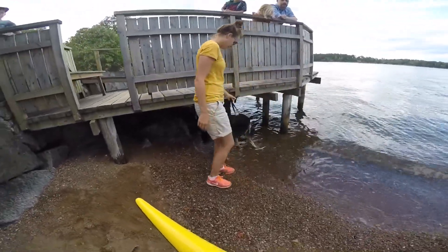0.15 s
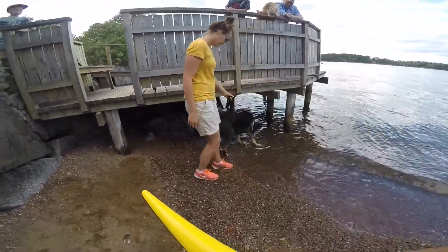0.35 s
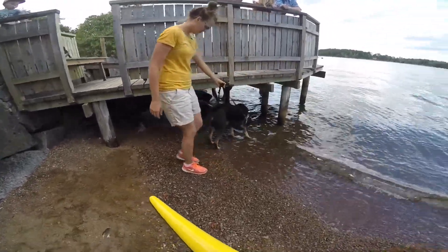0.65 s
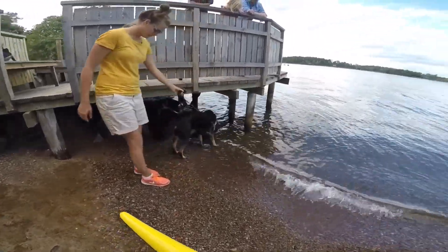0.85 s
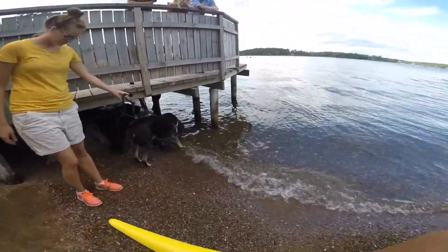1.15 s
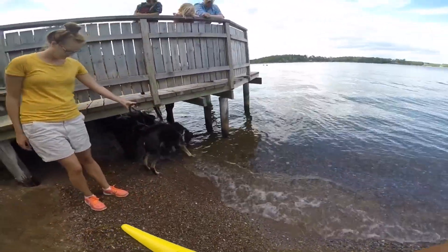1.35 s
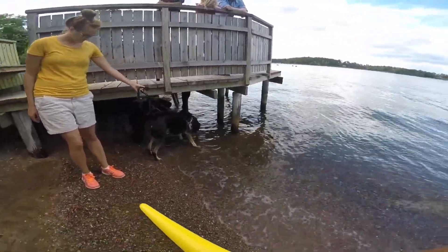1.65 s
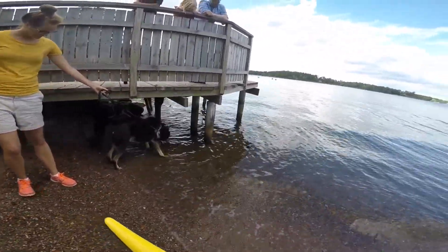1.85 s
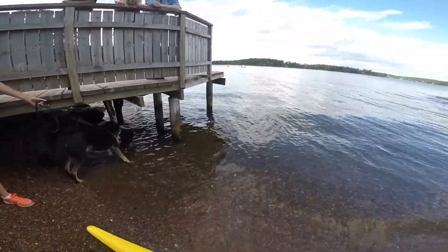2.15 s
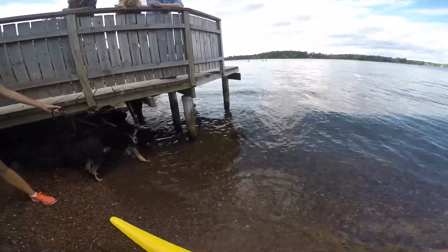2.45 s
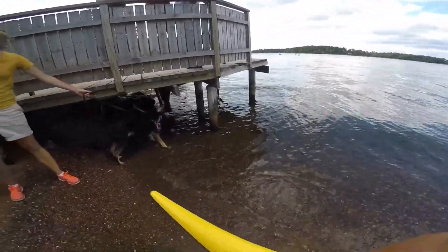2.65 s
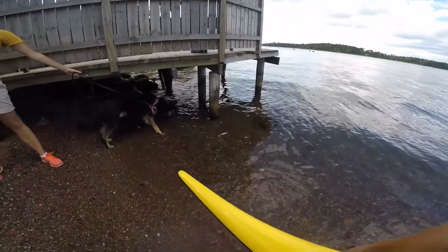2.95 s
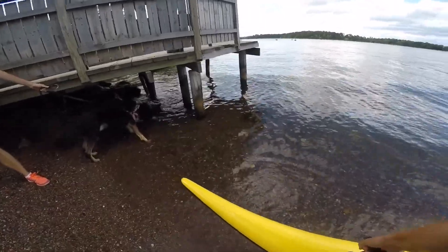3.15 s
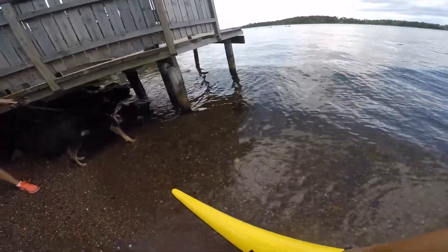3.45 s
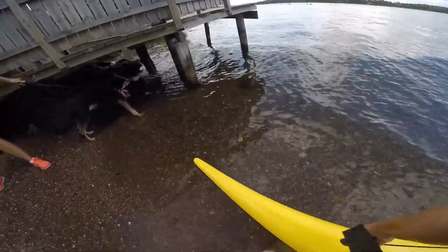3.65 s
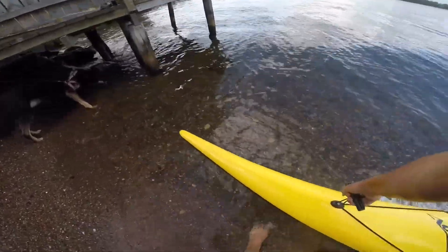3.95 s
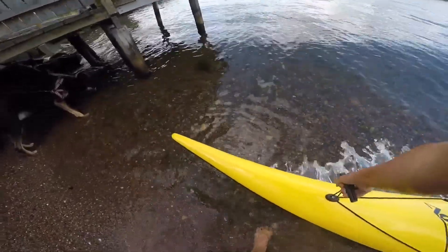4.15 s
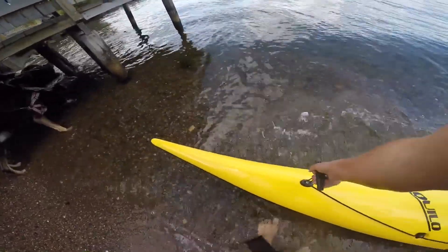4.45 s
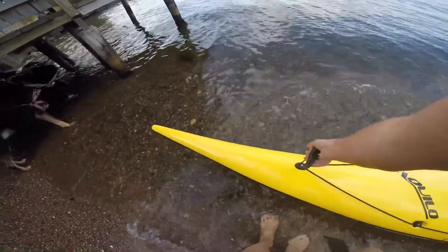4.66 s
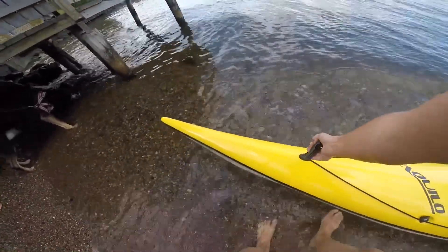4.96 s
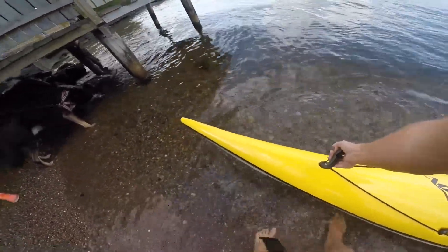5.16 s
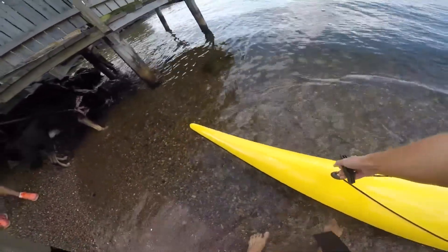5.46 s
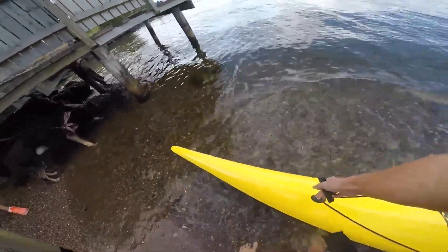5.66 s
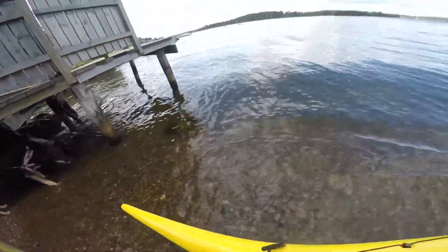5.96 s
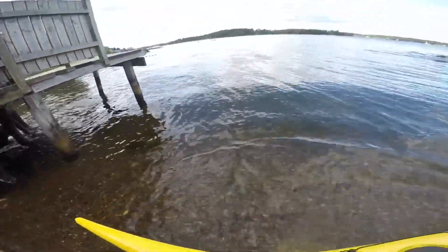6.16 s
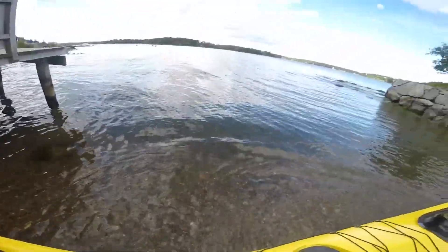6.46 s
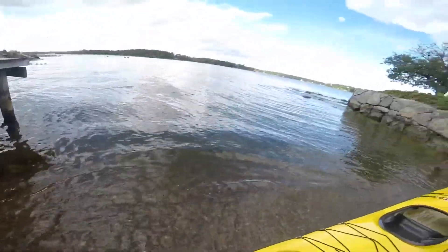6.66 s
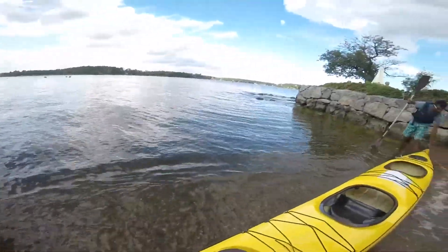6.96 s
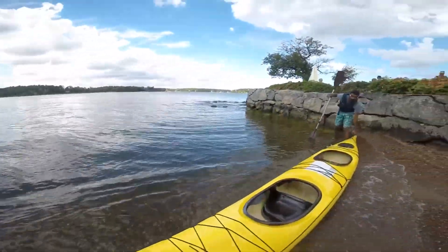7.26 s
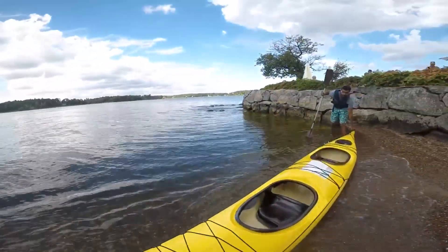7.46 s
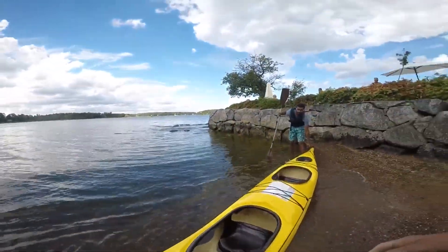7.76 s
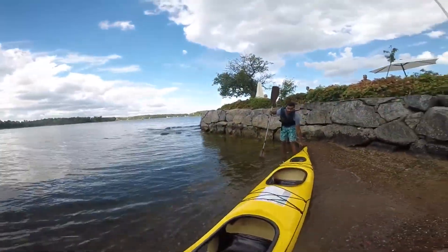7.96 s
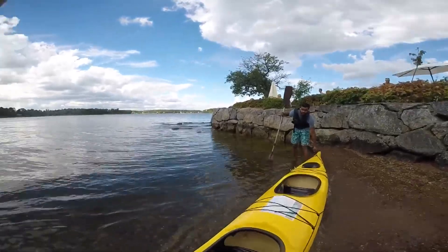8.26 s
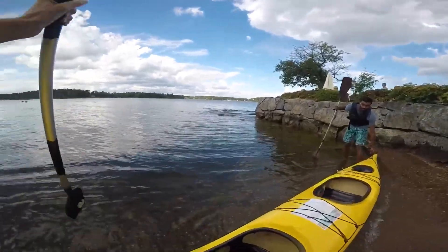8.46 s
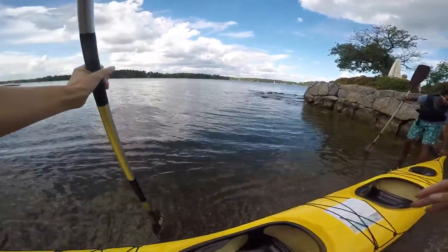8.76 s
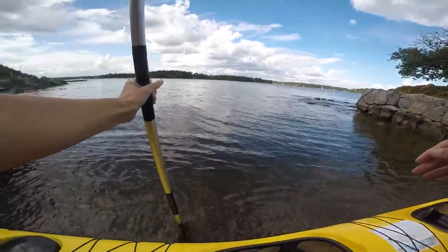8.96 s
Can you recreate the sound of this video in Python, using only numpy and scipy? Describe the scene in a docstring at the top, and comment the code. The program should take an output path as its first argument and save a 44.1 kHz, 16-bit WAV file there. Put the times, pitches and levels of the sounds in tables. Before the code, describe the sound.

Close, boxy knocks and low thumps come in uneven bursts as a plastic kayak is dragged over gravel on an open shore. Pebbles crunch and small waves wash and fizz. The heaviest blows land just after five seconds, briefly ducking everything; then it calms to scrapes, paddle clicks and a plip. A body-worn microphone in a hard case rumbles with movement.

```python
"""On a gravel beach a plastic kayak is hauled into the shallows, heard from a body-worn camera in a hard case.
Each heave knocks and judders: damped modes of the case over a swinging mount, with one thin ring left hanging.
Hull and gear scrape and steps crunch (coloured grains); paddle and fittings click (short modes) and bubbles plip.
Small waves wash and fizz over the pebbles (grains and froth), and the movement rumbles underneath.
The camera's limiter ducks everything for a moment after the hardest knocks."""
import sys
import numpy as np
from scipy.fft import rfft, irfft, next_fast_len
from scipy.io import wavfile
from scipy.ndimage import uniform_filter1d, map_coordinates

SR = 44100
rng = np.random.default_rng(int(sys.argv[2]) if len(sys.argv) > 2 else 0)


def unload_audio(sound):
    """Save the sound as a 16-bit wav file, at the path given as the first command line argument."""
    columns = np.transpose(np.atleast_2d(sound))
    # keep every value between -1 and 1, then stretch to whole-number steps
    steps = np.round(np.clip(columns, -1, 1) * 32767)
    wavfile.write(sys.argv[1], SR, steps.astype(np.int16))


N = 401751


def amp(db):
    """Decibels to amplitude."""
    return 10 ** (np.asarray(db) / 20)


def unit(x):
    """Scale to rms 1."""
    return x / np.sqrt(np.mean(x ** 2) + 1e-20)


def along(points, hz):
    """Read a value off (f/Hz, value) points on a log frequency axis."""
    f, v = np.transpose(points)
    return np.interp(np.log(hz + 1), np.log(f), v)


def curves(rows):
    """One value per sample for each column after the time."""
    s, *cols = np.transpose(rows)
    return [np.interp(np.arange(N) / SR, s, c) for c in cols]


def wobble(rate):
    """A smooth random curve, rate knots a second."""
    knots = rng.standard_normal(int(N * rate / SR) + 4)
    return map_coordinates(knots, [np.arange(N) * rate / SR])


def swell(middle, rise, fall):
    """A smooth hump of height 1 with its own rise and fall times."""
    t = np.arange(N) / SR - middle
    return np.exp(-np.minimum((t / np.where(t < 0, rise, fall)) ** 2, 40))


def filtered(x, response):
    """Multiply the spectrum of x by a response of frequency."""
    size = x.shape[-1]
    m = next_fast_len(size + 8192)
    return irfft(rfft(x, m) * response(np.fft.rfftfreq(m, 1 / SR)), m)[..., :size]


def add(track, s, sound):
    """Mix a sound into the track at time s."""
    part = track[:, max(round(s * SR), 0):][:, :sound.shape[-1]]
    part += sound[..., :part.shape[-1]]


def snippet(bed, t):
    """A random stretch of a long noise, as long as t."""
    start = rng.integers(N - len(t))
    return bed[:, start:start + len(t)]


def grains(rate, spread_db, hiss):
    """Two streams of tiny contacts of uneven size over an even hiss."""
    chance = rng.random((2, N))
    size = rng.standard_normal((2, N))
    smooth = rng.standard_normal((2, N))
    contacts = (chance < rate / SR) * np.sign(smooth) * amp(spread_db * np.clip(size, -2, 2))
    return unit(contacts) + hiss * smooth


def stereo(pair, spectrum, alike):
    """Colour two unrelated streams and spread them over the ports as middle and side; the middle has rms 1."""
    def response(hz):
        turn = np.arccos(np.clip(along(alike, hz), -.95, .995)) / 2
        return amp(along(spectrum, hz)) * np.array([np.ones_like(hz), np.tan(turn)])

    mid, side = filtered(pair, response)
    return np.array([mid + side, mid - side]) / np.std(mid)


def ring(t, hz, t60, rise, lead=0):
    """One mode: swells smoothly over the contact time while it decays exponentially."""
    decay = np.exp(-np.log(1000) * t / t60)
    onset = 1 - np.exp(-(t / rise) ** 3)
    return np.sin(2 * np.pi * hz * t + lead) * decay * onset


def bubble(t, hz, life):
    """A trapped bubble swells, rings at one pitch and dies away."""
    envelope = (t / life) ** 2 * np.exp(2 - 2 * t / life)
    return envelope * np.sin(2 * np.pi * hz * t + np.array([[0], [.6]]))


def froth(count, hz, spread_db):
    """Many small bubbles of uneven size, pitch and side, at rms 1."""
    track, t = np.zeros((2, N)), np.arange(SR // 50) / SR
    for s, (pitch, size, side) in zip(rng.uniform(0, N / SR, count), rng.standard_normal((count, 3))):
        bubble_hz = hz * np.exp(.22 * pitch)
        level_db = spread_db * min(size, 2) + side * np.array([[2], [-2]])
        add(track, s, amp(level_db) * bubble(t, bubble_hz, 4 / bubble_hz))
    return unit(track)


# wavelets on the pebbles: (crest t/s, run-up t/s, drain t/s, wash level/dB, fizz level/dB)
WAVELETS = [(.03, 0.13, 0.17, -47.5, -57.5), (.95, 0.26, 0.4, -39.5, -51.5), (1.7, 0.96, 0.51, -49, -63),
            (2.7, 1, 0.71, -48.5, -57.5), (3.5, 0.46, 0.22, -46.5, -60), (4.301, 0.15, 0.47, -42, -48),
            (4.62, 0.41, 0.14, -37.5, -65), (5.17, 0.22, 0.27, -34, -49), (6.05, 0.23, 0.27, -43, -64),
            (6.85, 0.58, 0.75, -48, -57.5), (8.95, 1, 0.52, -46.5, -58)]
LULL_DB, LULL_FIZZ_DB = -53.5, -59  # wash and fizz between wavelets
CREST_DB, CREST_LEAD_S = -9, 0.066  # fine froth relative to the wash, and how far it runs ahead


def surf(waves, lull_db, lead_s):
    """Strength of all the wavelets together, lead_s early: their powers add to that of the lull."""
    power = sum((amp(db) * swell(s - lead_s, rise, drain)) ** 2 for s, rise, drain, db in waves)
    return np.sqrt(amp(lull_db) ** 2 + power)


# spectra of the rolling water and of the fizz: (f/Hz, density level/dB)
WASH_SPECTRUM = [(150, -6), (330, 1), (500, -6.5), (850, -8), (1250, -5.5), (1550, 1), (1850, 5), (2450, 2),
                 (2950, -11.5), (4000, -12.5), (7000, -19.5), (12000, -77)]
FIZZ_SPECTRUM = [(1500, -60.5), (3200, 5.5), (4000, 0), (4700, 4), (6000, 0), (7200, 0), (8200, -4.5),
                 (10000, -4), (11500, -10.5), (14000, -9), (16000, -64)]
# airborne sound at the two ports: (f/Hz, left-right likeness; below zero the ports move against each other)
AIR_ALIKE = [(150, 0.79), (550, -0.62), (1100, -0.73), (2000, 0.76), (3500, -0.28), (8000, -0.13)]


def shore():
    """Wavelets run up the beach behind a crest of fine froth, rolling pebbles and fizzing as they drain."""
    washes = [row[:4] for row in WAVELETS]
    fizzes = [(*row[:3], row[-1]) for row in WAVELETS]
    water = stereo(grains(rate=1300, spread_db=0.0, hiss=1.0), WASH_SPECTRUM, AIR_ALIKE)
    water += amp(-7.0) * froth(count=2500, hz=1856, spread_db=4.0)
    crest = amp(CREST_DB) * froth(count=3000, hz=2455, spread_db=1.0)
    fizz = stereo(grains(rate=2800, spread_db=-3, hiss=1.0), FIZZ_SPECTRUM, AIR_ALIKE)
    ripple = amp(1.4 * wobble(22) + 1.1 * wobble(70))
    sea = water * surf(washes, LULL_DB, 0)
    sea += crest * surf(washes, LULL_DB, CREST_LEAD_S)
    sea += fizz * surf(fizzes, LULL_FIZZ_DB, 0)
    return ripple * sea


def bumps(count, spread_db):
    """Soft little jolts of the mount at random moments, at rms 1."""
    track, t = np.zeros((2, N)), np.arange(SR // 12) / SR
    for s, (pitch, size) in zip(rng.uniform(0, N / SR, count), rng.standard_normal((count, 2))):
        jolt = ring(t, 115 * np.exp(.16 * pitch), 0.028, 0.0036)
        add(track, s, amp(spread_db * min(size, 1)) * jolt)
    return unit(track)


# rumble of the wearer's movement, before trims: (t/s, sway level/dB, shudder level/dB)
MOVEMENT = [(0.0, -49, -39.5), (0.56, -38.5, -43.5), (0.94, -30, -38), (2.64, -32.5, -38),
            (2.81, -34, -33.5), (3.75, -21.5, -36.5), (3.91, -41, -50), (4.16, -37, -46),
            (4.41, -30.5, -49.5), (5.33, -27, -33), (5.81, -44, -41.5), (6.6, -38, -41.5),
            (7.5, -29, -34.5), (7.66, -32, -21.5), (7.81, -19, -33), (7.9, -25.5, -40), (8.2, -37, -26.5),
            (8.45, -26, -35), (8.83, -43.5, -40), (9.11, -18.5, -41)]
# spectra of the slow sway and of the droning mount: (f/Hz, density level/dB)
SWAY_SPECTRUM = [(8, 0.5), (20, 3.5), (45, -4), (75, -5.5), (120, -25), (300, -35.5), (800, -78)]
DRONE_SPECTRUM = [(30, -4.5), (80, -5), (135, 1), (175, 1), (240, -16.5), (350, -21), (600, -20),
                  (1500, -62)]
# sound carried by the case: (f/Hz, left-right likeness; below zero the ports move against each other)
CASE_ALIKE = [(60, 0.98), (150, 0.94), (300, 0.31), (550, -0.72), (1100, -0.36), (2000, 0.6), (4500, -0.53),
              (9000, -0.071)]
HEAVE_DB, HEAVE_GROWS, HEAVE_S = -29, 0.75, 0.072  # sway around a 0 dB thump; dB per dB of thump; half width
DRAG_DB, DRAG_S = -6, 0.16  # sway around a scrape, relative to its drone; half width


def movement():
    """The wearer's steps and sway rumble through the mount in lumps, swelling around each knock and scrape."""
    sway_db, shudder_db = curves(MOVEMENT)
    heaves = sum((amp(HEAVE_DB + HEAVE_GROWS * thump_db) * swell(s, HEAVE_S, HEAVE_S)) ** 2
                 for s, thump_db, *_ in KNOCKS)
    drags = sum((amp(DRAG_DB + drone_db) * swell((start + end) / 2, DRAG_S, DRAG_S)) ** 2
                for start, end, _, _, drone_db, _ in SCRAPES)
    effort = np.sqrt(amp(sway_db - 2.5) ** 2 + heaves + drags)
    sway_noise = stereo(rng.standard_normal((2, N)), SWAY_SPECTRUM, CASE_ALIKE)
    sway = sway_noise * effort * amp(0.53 * wobble(29))
    lumps = amp(3.5 * wobble(18))
    shudder = stereo(rng.standard_normal((2, N)), DRONE_SPECTRUM, CASE_ALIKE) * lumps * amp(-7.5)
    shudder += amp(-4.0) * bumps(count=140, spread_db=2.5)
    return sway + shudder * amp(shudder_db)


# gravel giving way under a foot or the keel: (middle t/s, length t/s, level/dB)
STEPS = [(0.952, 0.052, -35.5), (1.044, 0.076, -39.5), (1.41, 0.16, -43), (1.833, 0.076, -35.5),
         (2.255, 0.11, -40), (2.457, 0.073, -42.5), (2.887, 0.11, -37), (3.774, 0.24, -41.5),
         (4.274, 0.078, -37.5), (8.854, 0.066, -41.5)]
# spectrum of the crunch: (f/Hz, density level/dB)
GRAVEL_SPECTRUM = [(700, -22), (1400, 6), (2100, 11), (3400, -1.5), (4100, 0), (4800, -1.5), (7200, -5),
                   (8300, -10), (10000, -11), (11200, -27), (13000, -20), (15000, -72)]


def steps():
    """Pebbles shift in a short swell of fine crunching."""
    t = np.arange(N) / SR
    weight = sum(amp(db) * np.exp(-2 * np.abs((t - s) / length * 1.66) ** 3) for s, length, db in STEPS)
    return stereo(grains(rate=1900, spread_db=8.0, hiss=0.93), GRAVEL_SPECTRUM, AIR_ALIKE) * weight


# bubbles from feet and paddle in the water: (t/s, f/Hz, life t/s, level/dB)
PLIPS = [(4.31, 2644, 0.0019, -23.5), (4.315, 2500, 0.0019, -22), (4.321, 2746, 0.0014, -30),
         (6.944, 2890, 0.0013, -27.5), (6.945, 2240, 0.0012, -33), (8.8255, 2230, 0.0012, -12.5),
         (8.835, 1900, 0.0022, -14), (8.853, 2210, 0.0072, -34)]


def plips():
    """Each dip into the water traps one bubble amid a short spatter."""
    track, t = np.zeros((2, N)), np.arange(SR // 10) / SR
    spectrum = [(700, -32), (1300, 9.0), (2500, 10.5), (4500, 3.0), (10000, -22.5)]
    spatter = stereo(grains(rate=1200, spread_db=9.0, hiss=0.17), spectrum, AIR_ALIKE)
    for s, hz, life, db in PLIPS:
        splash = amp(-13.5) * snippet(spatter, t) * np.exp(-t / 0.0083)
        add(track, s, amp(db) * (bubble(t, hz, life) + splash))
    return track


# clicks of paddle and fittings: (t/s, low ring level/dB, high ring level/dB), before trims
CLICKS = [(5.8974, -24, -43), (6.171, -25.5, -47), (6.2283, -4.5, -21), (6.256, -19.5, -26.5),
          (6.29, -31, -31), (6.2955, -26, -33), (6.3155, -20, -13.5), (6.321, -27, -25),
          (6.375, -35, -43.5), (7.283, -30.5, -46), (7.424, -30.5, -44.5), (7.4586, -25, -23.5),
          (7.71, -13.5, -23.5), (7.7783, -20, -23.5), (7.783, -21, -25.5), (7.9163, -17.5, -22.5),
          (7.949, -16, -36.5), (8.04, -34, -30), (8.1218, -45, -26), (8.9797, -23, -22),
          (9.084, -28, -36.5)]
# nominal modes of the fittings: (f/Hz, t60 t/s, relative level/dB)
FITTING_MODES = [(1854, 0.009, -3), (2110, 0.0019, 14), (2470, .006, -10), (3160, 0.0071, -3),
                 (3690, 0.0057, -6), (4640, 0.012, -8.5), (5320, 0.0018, 6), (5380, 0.057, -21),
                 (6130, 0.0039, -5), (7540, 0.0053, -7.5)]


def clicks():
    """Hard little contacts: a broad snap and short rings, with the low and high modes struck separately."""
    track, t = np.zeros((2, N)), np.arange(SR // 16) / SR
    spectrum = [(600, -31), (1500, -8.5), (4500, 7.5), (7000, -1.5), (10000, -16.5), (15000, -18.5)]
    snap = stereo(rng.standard_normal((2, N)), spectrum, AIR_ALIKE)
    for s, low_db, high_db in CLICKS:
        envelope = np.exp(-t / 0.0021) * (1 - np.exp(-t / 0.00015))
        sound = amp(high_db + 5.5) * snippet(snap, t) * envelope
        for hz, t60, db in FITTING_MODES:
            touch_db = along([(3400, low_db), (6000, high_db)], hz)
            lead = rng.uniform(0, 2 * np.pi) + 1.3 * rng.standard_normal((2, 1))
            pitch = hz * (1 + .02 * rng.standard_normal())
            sound += amp(db + touch_db + 13.0) * ring(t, pitch, t60, 0.00072, lead)
        add(track, s, sound)
    return track


# scrapes: (start t/s, end t/s, rasp level/dB, grit level/dB, drone level/dB, scuff level/dB)
SCRAPES = [(0, 0.018, -33, -53, -21, -41), (2.787, 2.848, -39.5, -54, -27, -49),
           (3.75, 3.83, -32.5, -51, -20.5, -43), (4.766, 4.895, -32.5, -44.5, -23, -36.5),
           (5.743, 6.108, -35, -44.5, -36, -48), (6.101, 6.24, -47.5, -56, -36.5, -45),
           (6.277, 6.294, -54, -37, -31.5, -33.5), (7.021, 7.159, -35, -51, -31.5, -43),
           (7.566, 7.761, -35, -37.5, -22, -32.5), (7.902, 7.972, -29.5, -57, -28.5, -35),
           (8.042, 8.176, -31, -38.5, -28.5, -38), (8.228, 8.351, -31, -43, -36, -50.5),
           (8.381, 8.409, -31.5, -38.5, -24, -39), (8.978, 9.055, -30, -45, -26, -22)]
# spectra of the rubbing layers: (f/Hz, density level/dB)
RASP_SPECTRUM = [(150, 6.5), (260, -2), (380, -6), (490, -1), (620, -7.5), (850, -7.5), (1150, -2),
                 (1480, 1.5), (1900, -10.5), (2450, -3.5), (2850, -22.5), (3400, -11.5), (4500, -27),
                 (7000, -38.5), (12000, -52)]
GRIT_SPECTRUM = [(1500, -1), (2400, 10.5), (3400, -0.5), (4100, -6), (4650, 1), (5500, -17), (7400, -11.5),
                 (8300, -11), (10000, -20), (12000, -43), (15000, -31)]
SCUFF_SPECTRUM = [(500, -21.5), (800, -19.5), (1100, -7.5), (1750, 1.5), (2050, -3), (2450, -17),
                  (3000, -5.5), (4100, -14), (4600, -8), (5800, -17), (7300, -20), (9000, -33.5),
                  (14000, -53)]
# the scuff at the two ports: (f/Hz, left-right likeness)
SCUFF_ALIKE = [(700, -.5), (1400, 0.14), (2000, .4), (4000, 0)]
GRIP_S, RELEASE_S, ARCH_DB = 0.028, 0.036, 1.5  # a scrape bites, lets go, and presses harder in its middle


def scrapes():
    """Rubbing is a dense crowd of tiny catches: rasp, brighter scuff and fine grit, with the mount droning below."""
    t = np.arange(N) / SR
    catches = amp(1.8 * wobble(110))
    rasp = stereo(grains(rate=3000, spread_db=2.5, hiss=.45), RASP_SPECTRUM, CASE_ALIKE)
    grit = stereo(grains(rate=2500, spread_db=1, hiss=.5), GRIT_SPECTRUM, CASE_ALIKE)
    grit *= amp(2.2 * wobble(170))
    scuff = stereo(grains(rate=4000, spread_db=1.5, hiss=.5), SCUFF_SPECTRUM, SCUFF_ALIKE)
    drone = stereo(rng.standard_normal((2, N)), DRONE_SPECTRUM, CASE_ALIKE)
    track = np.zeros((2, N))
    for start, end, rasp_db, grit_db, drone_db, scuff_db in SCRAPES:
        contact = np.clip(np.minimum((t - start) / GRIP_S, (end - t) / RELEASE_S) + .5, 0, 1)
        pressure = amp(-ARCH_DB * np.interp(t, [start, end], [-1, 1]) ** 2)
        rub = amp(rasp_db) * rasp + amp(grit_db) * grit + amp(scuff_db) * scuff
        track += contact * (pressure * catches * rub + amp(drone_db) * drone)
    return track


SING_HZ, SING_T60_S, SING_DB = 1502, .7, -41  # level relative to the clack, which counts as -2 dB at most


def singing():
    """Every knock leaves a faint high ring hanging in the case, louder after a harder clack."""
    track, t = np.zeros((2, N)), np.arange(SR) / SR
    for s, _, clack_db, *_ in KNOCKS:
        lead = rng.uniform(0, 2 * np.pi) + np.array([[0], [1]])
        add(track, s, amp(SING_DB + min(clack_db, -2)) * ring(t, SING_HZ, SING_T60_S, .002, lead))
    return track


# nominal modes of the case: (f/Hz, t60 t/s, left level/dB, right level/dB, right lead/rad)
CASE_MODES = [(320, .035, -19, -25.5, 2.25), (481, 0.056, -20.5, -27.5, 2.5), (607, 0.044, -21.5, -23.5, 3),
              (726, 0.041, -25.5, -21.5, 3), (1034, 0.007, -11.5, -9.5, 2.5), (1240, .012, -12, -10.5, 2.5),
              (1485, 0.021, -20.5, -18.5, 1.5), (2100, 0.014, -35, -21.5, -1), (2462, .015, -28, -28, -0.3),
              (3337, 0.0059, -27.5, -25.5, -0.1), (4520, 0.014, -50, -44.5, 4.5),
              (5650, 0.011, -35, -41, 4)]
BRIGHT_ABOVE_HZ = 1800  # brightness lifts the modes above this
BOOM_DB, BOOM_BELOW_HZ = -2, 800  # the modes below this answer the thump
LOW_MODES_DB = -5.5  # how weakly a clack stirs those low modes


def clack(t, force_db, bright_db, hollow_db, vary_db, detune):
    """The stiff modes of the case share the energy of a blow anew each time."""
    sound = np.zeros((2, len(t)))
    for k, (hz, t60, left_db, right_db, lead) in enumerate(CASE_MODES):
        size, shift = rng.standard_normal(2)
        # broad modes shift most with the point of contact
        pitch = hz * (1 + detune * shift * min(.01 / t60, 1))
        share_db = vary_db * size + bright_db * (hz > BRIGHT_ABOVE_HZ)
        share_db += (LOW_MODES_DB + hollow_db) * (hz < BOOM_BELOW_HZ)
        # neighbouring modes swing in opposite directions
        mode = (-1) ** k * ring(t[t < 2 * t60], pitch, t60, 0.00044, np.array([[0], [lead]]))
        add(sound, 0, amp(share_db + np.array([[left_db], [right_db]])) * mode)
    return amp(force_db - 29.5) * sound / np.sqrt(np.sum(sound ** 2) / SR)


def boom(t):
    """The low modes of the case give a thump its hollow body."""
    body = 0
    for hz, t60, left_db, right_db, lead in CASE_MODES:
        if hz < BOOM_BELOW_HZ:
            level_db = np.array([[left_db], [right_db]]) + 2 * rng.standard_normal()
            body = body + amp(level_db) * ring(t, hz, t60, 0.0002, np.array([[0], [lead]]))
    return amp(BOOM_DB) * body


OVERTONE_DB = -20  # second partial of the mount's swing, 3 dB up on the left and down on the right


def swing(turns):
    """The mount is stiffer one way than the other, so its swing carries an overtone."""
    overtone = amp(OVERTONE_DB + np.array([[3], [-3]])) * np.sin(4 * np.pi * turns)
    return np.sin(2 * np.pi * turns) + overtone


# stick-slip judders: (start t/s, end t/s, slip rate f/Hz, swing level/dB, clack level/dB, grinding level/dB)
JUDDERS = [(2.774, 2.794, 145, -7.5, -22, -30.5), (3.638, 3.667, 190, -10.5, -26, -35),
           (3.681, 3.726, 130, -8.5, -29, -36.5), (3.843, 3.868, 115, -12.5, -49, -46),
           (4.45, 4.491, 137, -13.5, -37, -33), (4.498, 4.528, 102, -6, -34, -32),
           (4.695, 4.741, 130, -16, -42, -49), (5.34, 5.37, 125, 0, 3, -37.5)]
SLIP_FADE_DB_PER_S = 275  # the slips of a judder die away


def judders():
    """The hull sticks and slips: the mount swings at the slip rate, with fading clacks over a grinding rasp."""
    track, t = np.zeros((2, N)), np.arange(SR // 8) / SR
    rasp = stereo(rng.standard_normal((2, N)), RASP_SPECTRUM, CASE_ALIKE)
    for start, end, rate, swing_db, clack_db, grind_db in JUDDERS:
        turns = np.cumsum(rate * np.exp(.1 * wobble(70)[:len(t)])) / SR  # the rate wavers
        held = np.clip(np.minimum(t / 0.0022, (end - start - t) / 0.014 + .5), 0, 1)
        add(track, start, held * (amp(swing_db) * swing(turns) + amp(grind_db) * snippet(rasp, t)))
        slip_times = np.interp(np.arange(np.ceil((end - start) * rate)), turns, t)
        for late in slip_times:
            slip = amp(swing_db) * boom(t)
            slip += clack(t, clack_db, bright_db=-27, hollow_db=4.5, vary_db=0.5, detune=0.051)
            add(track, start + late, slip * amp(2 * rng.standard_normal() - SLIP_FADE_DB_PER_S * late))
    return track


def thump(t, hz, length):
    """The whole camera swings a few times on its mount and stops, on top of one slow shove."""
    held = np.exp(-(t / length) ** 2) * (1 - np.exp(-(t / 0.0019) ** 2))
    shove = 0.34 * ring(t, 76.3, 0.059, 0.0041)
    return amp(-3.0) * held * swing(hz * t) * amp([[.5], [-.5]]) + shove


# knocks, before trims:
# (t/s, thump level/dB, clack level/dB, brightness level/dB, thump f/Hz, hollow ring level/dB)
KNOCKS = [(.111, -16, -36, -10, 62, -4), (.153, 2, -3, -6, 142, 1.5), (.23, 0.5, -6.5, -8.5, 121, -0.5),
          (0.246, -4.5, -15, -20, 110, 7), (.259, -4.5, -8.5, -17, 102, 3), (.272, 1, -8, -19, 111, -5.5),
          (0.28, -6, -9.5, -20, 123, 1), (.308, -16.5, -43, -10, 105, -13), (.435, -30, -41, -8, 120, 1),
          (.675, -11, -17.5, -11, 88.5, 5), (.796, -17.5, -34, -2, 191, 6),
          (.857, -2, -14.5, 2.5, 88, -2.5), (.908, -8.5, -10, 5, 79.5, 4.5), (0.927, -5.5, -27, 0, 116, 4),
          (1.011, -4, -13, -5.5, 131, 1.5), (1.189, -8, -10.5, 4, 111.6, -5.5),
          (1.372, -15, -13.5, 2, 127, -3), (1.409, -8, -29, -6, 76.5, -5.5),
          (1.603, -24.5, -31, -21, 155, -2), (1.696, -5, -8, -3, 143, -12.5), (1.86, -19, -43, -10, 118, 5),
          (1.926, -5, -8.5, 6.5, 94, 1), (2.162, -13, -18.5, -0.5, 85, 5),
          (2.282, -2, -8, -7.5, 130.6, -2.5), (2.676, -11, -37, -10, 124, -4),
          (2.682, -7, -10.5, -6.5, 121, -1), (2.699, -9, -37, -13, 117, -2),
          (2.761, -2.5, -4.5, 1.5, 123, 0), (2.864, -8, -36, -10, 101, -5), (2.875, -7, -9.5, 1.5, 80, 2.5),
          (2.953, -4, -2, 2, 108, -7.5), (3.074, -3, -9, 9, 92, -5), (3.296, -10, -19.5, -2.5, 148.5, 5.5),
          (3.33, -9.5, -23.5, -6, 81, -2), (3.45, -11, -29, -21, 80, -2), (3.523, -16.5, -23.5, -5, 80, 2),
          (3.586, -8.5, -8, -0.5, 90, -6), (3.63, -3, -9, 2.5, 182.6, 3.5), (3.691, -5.5, -10, -11, 121, 6),
          (3.706, -4, -8.5, -21, 125, 2.5), (3.733, 0, -3.5, 0.5, 132, 2.5), (3.832, -4, -1.5, -5, 121, -2),
          (4.268, -10, -39, 7, 142, -6), (4.435, -6.5, -12.5, 1, 104.6, 6), (4.507, -6, -13.5, -10, 104, 7),
          (4.675, -2, -5, -8, 136, 1), (4.724, -13, -39, -14, 114, 5), (5.073, -2, -17.5, 6, 102, -24),
          (5.125, -5, -0.5, 4.5, 141, -7), (5.248, 9.5, 8, 0, 108, -7.5), (5.318, 9.5, 4, 1, 97, -10),
          (5.335, -7.5, -1, -7, 126, -6), (5.414, 7, 5.5, 0, 139, -5.5), (5.442, 2, -9, -29, 141.6, 0.5),
          (5.504, -7.5, -26, 2, 111, -5), (5.611, 2, -2, -2.5, 132, 0.5), (5.694, -3.5, -8, -19, 127, 2),
          (6.589, -25, -38.5, -3, 117, 0), (6.981, -7.5, -12.5, -21, 132, 3.5),
          (7.326, -4.5, -5.5, -8, 98, -3.5), (7.547, -9, -35, -12, 105, -3),
          (7.565, -14, -40, -10, 121, -11), (7.626, -11, -15.5, 4, 147, -4), (7.663, -7, -17, -23, 131, -1),
          (7.903, -14.5, -19, 0, 126, 8), (8.378, -9, -17, -14, 139, 6), (8.476, -13, -30.5, 7, 125, 2.5),
          (8.523, -9.5, -29.5, 11, 112.5, 1), (8.722, -27.5, -25.5, -15, 182, 3),
          (8.953, -8, -20, -7, 105, 3.5), (9.065, -11.5, -34, -10, 80, -0.5),
          (9.101, -17.5, -24, -2, 102, 2.5)]
SWING_S, SWING_GROWS = 0.013, 1  # length of a thump at 130 Hz; it grows with this power of pitch
CRACK_DB, CRACK_GROWS = -22, 1.4  # gritty crack relative to the clack; dB per dB of brightness


def knocks():
    """Single blows shake the mount and the case, which chatters briefly afterwards."""
    track, t = np.zeros((2, N)), np.arange(SR // 5) / SR
    grit, rasp, drone = (stereo(rng.standard_normal((2, N)), spectrum, CASE_ALIKE)
                         for spectrum in (GRIT_SPECTRUM, RASP_SPECTRUM, DRONE_SPECTRUM))
    contact = np.exp(-t / 0.0021) * (1 - np.exp(-(t / 0.00024) ** 2))
    bite = 1 - np.exp(-(t / .001) ** 2)  # chatter and grinding start softly
    for s, thump_db, clack_db, bright_db, hz, hollow_db in KNOCKS:
        # a faint, soft onset just before the blow
        onset = clack(t, clack_db - 24.5, bright_db, hollow_db, vary_db=-2.5, detune=0.02)
        add(track, s - .0012, onset)
        crack = amp(CRACK_DB + CRACK_GROWS * bright_db) * snippet(grit, t)
        crack += amp(-14) * snippet(rasp, t)
        body = clack(t, clack_db + 6, bright_db, hollow_db, vary_db=1.5, detune=.025)
        add(track, s, body + amp(clack_db) * crack * contact)
        chatter = amp(-11.0) * snippet(drone, t) * np.exp(-t / 0.013)
        chatter += amp(-28.5) * snippet(rasp, t) * np.exp(-t / 0.018)
        length = SWING_S * (hz / 130) ** SWING_GROWS
        shake = amp(0.5) * thump(t, hz, length) + amp(hollow_db) * boom(t) + bite * chatter
        add(track, s + 0.00113, amp(thump_db) * shake)
    return track


def scene():
    """All the layers together."""
    contacts = knocks() + judders() + singing() + clicks()
    return contacts + steps() + plips() + shore() + scrapes() + movement()


LIMIT_DB, RECOVER_DB_PER_S = -6, 61  # threshold and recovery


def limiter(x):
    """Loud blows push the gain of both ports down at once; it climbs back at a steady rate."""
    power = np.abs(uniform_filter1d(x ** 2, size=SR // 600)).max(axis=0)
    over_db = np.maximum(10 * np.log10(power + 1e-12) - LIMIT_DB, 0)
    climb_db = RECOVER_DB_PER_S * np.arange(N) / SR
    cut_db = np.maximum.accumulate(over_db + climb_db) - climb_db
    return x * amp(-uniform_filter1d(cut_db, size=SR // 1000))


# the case shades one port or the other: (f/Hz, left minus right level/dB)
PORT_SHADE = [(70, -1.5), (150, 3), (330, 4.5), (520, 4.5), (750, -1.5), (1250, -6), (2300, 0), (4500, -2),
              (8000, 0.5)]
TOP_HZ = 15250  # nothing passes above this


def record(dry):
    """The case colours each port and dulls the top; a limiter ducks after hard knocks and the last peaks round off."""
    def shade(hz):
        balance_db = along(PORT_SHADE, hz) * np.array([[.5], [-.5]])
        tone_db = along([(8, -30.0), (20, 5.0), (11000, -3.5), (15000, -14.0)], hz)
        return amp(balance_db + tone_db)

    ports = limiter(filtered(dry, shade))
    rounded = ports / (1 + np.abs(ports) ** 8) ** (1 / 8)
    return filtered(rounded, lambda hz: hz < TOP_HZ)


dry = scene()
out = record(dry)
unload_audio(out)
```